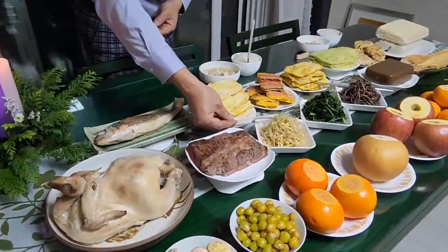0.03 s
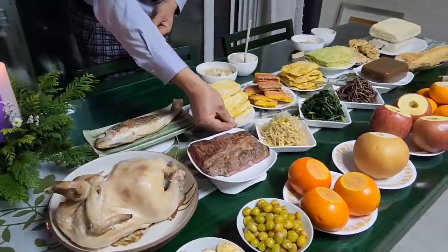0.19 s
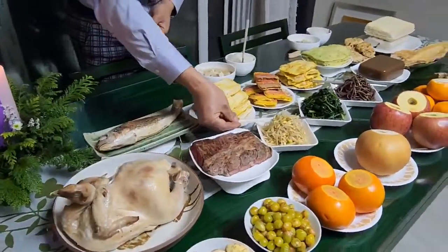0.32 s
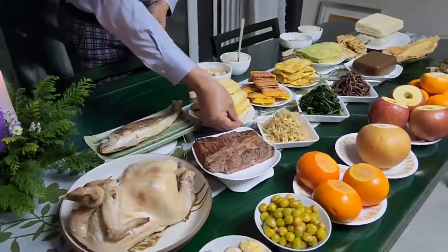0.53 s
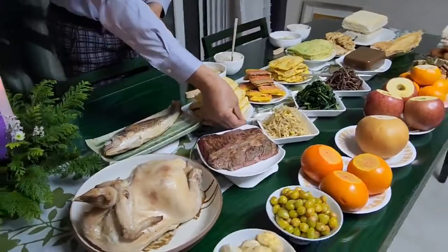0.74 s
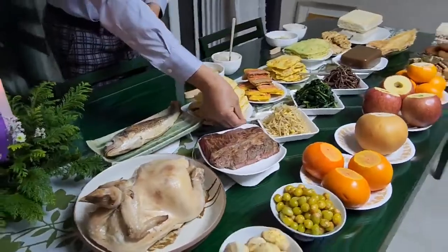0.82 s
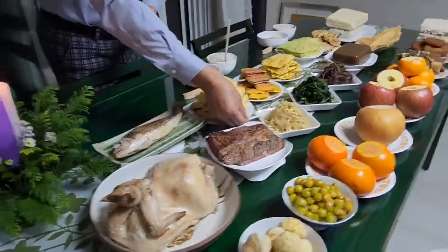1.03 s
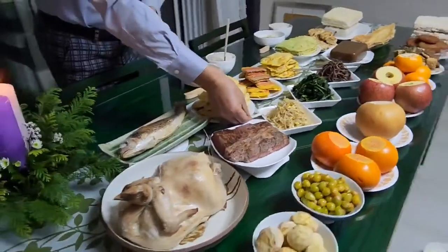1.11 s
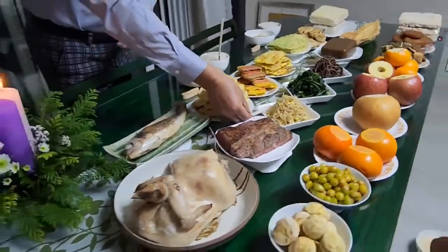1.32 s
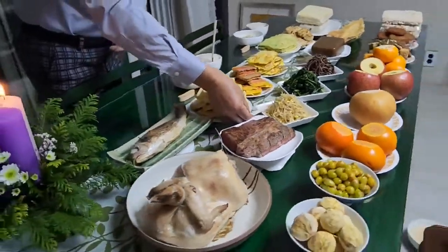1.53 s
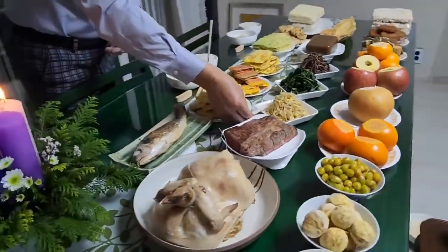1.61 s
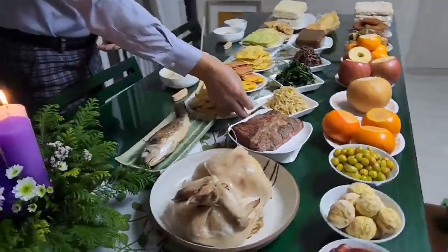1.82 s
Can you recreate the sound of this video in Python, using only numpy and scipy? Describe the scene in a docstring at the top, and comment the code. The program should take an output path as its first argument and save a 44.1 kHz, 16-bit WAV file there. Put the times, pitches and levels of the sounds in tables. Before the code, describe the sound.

Chopsticks set down on a dish with a loud, bright double clack, then dull little taps, a second clearer bowl clink and a closing flurry of ticks, in a bare, lively room, phone a couple of metres away.

```python
"""A bare, lively room, a couple of metres from a phone: chopsticks and dishes are set down on a table.
Each contact is a short clatter of a crack and its bounces. Clinks also ring a dish, built from fading
sines, and boom the table top; short taps knock a body instead. Shaped noise makes the room's answer,
the rustling sleeve and the quiet room tone. Soft thumps through the floor and a low hum are sines."""
import sys
import numpy as np
from scipy import signal
from scipy.fft import rfft, irfft
from scipy.io import wavfile
from scipy.ndimage import uniform_filter1d

SR = 44100
rng = np.random.default_rng(int(sys.argv[2]) if len(sys.argv) > 2 else 0)


def inscribe(sig):
    """Save sig as 16-bit PCM at rate SR to the path in sys.argv[1].

    A 1-D sig is mono; a 2-D sig holds one channel per row.
    Samples are clipped to [-1, 1] before scaling.
    """
    pcm = np.round(np.clip(np.atleast_2d(sig).T, -1, 1) * 32767)
    wavfile.write(sys.argv[1], SR, pcm.astype(np.int16))


N = 83790  # samples in the scene
SIZE = 32768  # samples worked out for each contact
FREQ = np.maximum(np.arange(SIZE // 2 + 1) * SR / SIZE, 1)  # Hz
ALIKE_HZ, BASS_WIDTH = 1240, 0.18  # below this pitch left and right are nearly the same


def undb(db):
    """Turn decibels into a plain multiplier."""
    return 10 ** (np.asarray(db) / 20)


def level(x, db):
    """Scale a sound to a given average (RMS) level."""
    return x * undb(db) / np.sqrt(np.mean(x ** 2))


def curve(hz, at_hz, values):
    """Join points with straight lines on a log-frequency axis."""
    return np.interp(np.log(hz), np.log(at_hz), values)


def stereo(count):
    """Spectra of left and right noise: a shared part plus an opposed part that shrinks in the bass."""
    hz = np.arange(count // 2 + 1) * SR / count
    mid, side = rfft(rng.standard_normal((2, count)))
    wide = np.maximum(hz / np.hypot(hz, ALIKE_HZ), BASS_WIDTH)
    opposed = np.array([[1], [-1]]) * wide * side
    return (mid + opposed) / np.sqrt(1 + wide ** 2)


def walk(rate):
    """A wandering control: random levels, rate of them per second, smoothed; its spread is 1."""
    hold = int(SR / rate)
    steps = np.repeat(rng.standard_normal(N // hold + 1), hold)
    smooth = uniform_filter1d(uniform_filter1d(steps, hold), hold)[:N]
    return smooth / np.std(smooth)


def coloured(points, flicker_db, rate):
    """Stereo noise with a given spectrum; each octave flickers on its own."""
    hz = np.maximum(np.arange(N // 2 + 1) * SR / N, 1)
    octaves = 60 * 2. ** np.arange(9)
    noise = stereo(N) * undb(curve(hz, *np.array(points).T))
    total = 0
    for k in range(9):
        band = irfft(noise * curve(hz, octaves, np.arange(9) == k), N)
        total = total + undb(flicker_db * walk(rate)) * band
    return total


# colour of the room tone: pitch_hz, relative level_db (per Hz)
TONE_COLOUR = [(30, -7), (60, -14), (130, -10), (350, -10.5), (800, -17), (1500, -22.5), (3000, -22),
               (6000, -31), (16000, -42)]
TONE_DB, TONE_FLICKER_DB, TONE_FLICKER_PER_S = -63, 1.0, 8


def room_tone():
    """Steady, quiet noise, strongest in the lows."""
    return level(coloured(TONE_COLOUR, TONE_FLICKER_DB, TONE_FLICKER_PER_S), TONE_DB)


HUM_HZ, HUM_DB = 59, -58
HUM_WAVER_DB, HUM_WAVER_PER_S = 2, 10


def hum(t):
    """A low sine, the same on both sides, whose level wavers and whose phase drifts a little."""
    loudness = undb(HUM_DB + HUM_WAVER_DB * walk(HUM_WAVER_PER_S))
    return loudness * np.sin(2 * np.pi * HUM_HZ * t + .5 * walk(7))


# soft thumps through the floor: start_s, level_db, pitch_hz, fade_s (time to fall by 60 dB)
FLOOR_THUMPS = [(0.865, -49, 67, 0.46), (1.003, -40.5, 73.3, 0.073)]


def floor_thumps(t):
    """Low sines that start at once and die away, the same on both sides."""
    total = 0
    for start, db, hz, fade in FLOOR_THUMPS:
        ago = np.maximum(t - start, 0)
        fading = undb(db) * np.exp(-np.log(1000) * ago / fade)
        total = total - fading * np.sin(2 * np.pi * hz * ago)
    return total


# swells of the sleeve: peak_s, level_db, rise_s (bell-shaped), fall_s (time to fall to 37 %)
SLEEVE_SWELLS = [(.455, -59.5, 0.06, 0.048), (0.864, -58.5, 0.034, 0.15), (1.225, -60.5, 0.031, 0.06),
                 (1.647, -55.5, 0.021, 0.072), (1.818, -46.5, 0.021, 0.013)]
# colour of the cloth: pitch_hz, relative level_db (per Hz)
CLOTH_COLOUR = [(300, -20), (1000, -1.5), (3000, -0.5), (6000, -3.5), (10000, -6), (15000, -10.5)]
CLOTH_GRAIN_DB, CLOTH_GRAIN_PER_S = 2.5, 170


def sleeve_rustles(t):
    """Grainy cloth hiss that swells and fades."""
    shape = 0
    for peak, db, rise, fall in SLEEVE_SWELLS:
        rising = np.exp(-((t - peak) / rise) ** 2)
        falling = np.exp(-np.abs(t - peak) / fall)
        shape = shape + undb(db) * np.where(t < peak, rising, falling)
    return shape * level(coloured(CLOTH_COLOUR, CLOTH_GRAIN_DB, CLOTH_GRAIN_PER_S), 0)


# the room's answer: pitch_hz, fade_s (to fall by 60 dB), build_s, level_db (before each hit's room_db)
ROOM_BANDS = [(170, 0.43, 0.014, 4.5), (400, 0.58, .01, 7.5), (770, 0.4, 0.0027, 9.5),
              (1600, 0.45, .006, 12.5), (3460, 0.26, 0.011, 13), (6400, 0.23, 0.012, 15),
              (12000, 0.25, .003, 11)]


def room():
    """Spectrum of the echoing room: noise that builds up and dies away band by band."""
    t, noise = np.arange(SIZE) / SR, stereo(SIZE)
    centres = [band[0] for band in ROOM_BANDS]
    tail = 0
    for k, (hz, fade, build, db) in enumerate(ROOM_BANDS):
        shape = (1 - np.exp(-t / build)) * np.exp(-np.log(1000) * t / fade)
        band = irfft(noise * curve(FREQ, centres, np.arange(len(centres)) == k))
        tail = tail + band * level(shape, db) / np.sqrt(SIZE)
    return rfft(tail)


def mode(hz, fade):
    """Spectrum of one sine of unit energy that falls by 60 dB in fade seconds (at least 5 ms)."""
    rate = np.log(1000) / max(fade, .005)
    resonance = (rate + 2j * np.pi * FREQ) ** 2 + (2 * np.pi * hz) ** 2
    return np.sqrt(rate / SR) * SR * 4 * np.pi * hz / resonance


# centres of the bass, middle, presence and treble bands of a contact: pitch_hz
BANDS_HZ = [550, 1600, 4200, 10000]
BOUNCE_DB, BOUNCE_SCATTER_DB = -3, 4
RING_BOUNCE = .35  # share of the ring that the bounces drive
RING_ROOM_DB = -8  # rings reach the walls weaker than cracks


def add_contact(out, start, db, bands_db, pan_db, length, room_db, crack, ring, boom=0):
    """One contact and a fading run of uneven bounces crack and ring; the room answers."""
    chance = rng.standard_normal((16, 3))
    when = np.r_[0, np.cumsum(np.abs(chance[1:, 0]))] / 5  # in clatter lengths
    size = undb(BOUNCE_DB + BOUNCE_SCATTER_DB * chance[:, 1]) * np.sign(chance[:, 2]) * np.exp(-when)
    size[0] = 1  # the first contact
    delays = np.exp(-2j * np.pi * FREQ * length * when[:, None])
    run = (size[:, None] * delays).sum(axis=0) / np.sqrt(np.sum(size ** 2))

    direct = run * (crack + boom) + (1 - RING_BOUNCE + RING_BOUNCE * run) * ring
    to_walls = crack + undb(RING_ROOM_DB) * ring + boom
    heard = direct + undb(room_db) * to_walls * room()

    per_hz_db = np.array(bands_db) - 10 * np.log10(np.array(BANDS_HZ) / SR)
    bass_cut = FREQ ** 2 / (FREQ ** 2 + 120 ** 2)
    tint = undb(curve(FREQ, BANDS_HZ, per_hz_db)) * bass_cut
    pad = .01  # seconds of space ahead of the contact
    sides = undb(db + np.array([[pan_db], [-pan_db]]) / 2)
    sound = irfft(heard * tint * np.exp(-2j * np.pi * FREQ * pad)) * sides
    i = int((start - pad) * SR)
    n = min(SIZE, N - i)
    out[:, i:i + n] += sound[:, :n]


# short taps: most knock a dull body, the last two are bright, high ticks. Columns:
# start_s, level_db (before TAP_DB), then bass_db, middle_db, presence_db, treble_db (tint),
# pan_db (left over right), body_hz, body_db (against the crack), clatter_s (bounces fade to 37 %),
# room_db (added to the room's answer)
TAPS = [(0.525, -58.5, -16, 1.5, -3, -38.5, 4, 400, -14, 0.0043, -2),
        (.559, -46, -8, -8, -24, -36, 4, 350, -5, .002, -8),
        (.62, -49, -9, -5, -18, -33, 3, 500, -14, .002, -5),
        (0.732, -32, -5.5, -4.5, -13.5, -31, 2, 326, -13.5, .004, -7),
        (0.895, -54.5, -25, -8, -14, -39, 18, 400, -7, 0.00046, -5),
        (1.041, -47, -7, -6.5, -14.5, -25, 5.5, 594, -11.5, 0.0036, 5.5),
        (1.136, -39.5, -4.5, -5, -15.5, -53, 4.5, 577, -11.5, 0.00222, -8),
        (1.287, -45, -7, -9, -20, -30, 4, 500, -14, .005, 0),
        (1.528, -54.5, 9, -1, -36, -49.5, 6, 445, -22, 0.00378, -9.5),
        (1.727, -38.5, -8.5, -15.5, -21, -35, 2.5, 673, -14.5, 0.0031, -3.5),
        (1.791, -41, -9.5, -2, -31, -16, 1.5, 605, -11.5, 0.0051, -1.5),
        (1.823, -39, -20, -7, -34, -11, 3, 9300, 3, 0.00091, -5.5),
        (1.892, -38.5, -21, -20, -8, -18, 3, 6800, 4, 0.0031, -5)]
TAP_DB, BODY_CYCLES = 14.5, 44  # a body falls by 60 dB in this many cycles, or 5 ms if longer


def taps():
    """Each tap cracks and knocks a body that gives one short note."""
    out = np.zeros((2, N))
    for start, db, low, mid, pres, top, pan, hz, body_db, length, room_db in TAPS:
        body = undb(TAP_DB + body_db) * mode(hz, BODY_CYCLES / hz)
        add_contact(out, start, db, (low, mid, pres, top), pan, length, room_db, undb(TAP_DB), body)
    return out


# contacts that ring a dish: start_s, level_db (before CRACK_DB and RING_DB), then bass_db, middle_db,
# presence_db, treble_db (tint), pan_db (left over right), boom_db (table top, before the level and
# tint), clatter_s (bounces fade to 37 %), room_db (added to the room's answer)
PLATE_HITS = [(.2205, -11, -26, -22, -19.5, -14, 0, 0.5, 0.0026, 2),
              (.236, -11, -18, -17.5, -22.5, -11, 1, -0.5, .0035, -2)]
BOWL_HITS = [(1.299, -31, -18, -17, -14, -32, -1, 5.5, 0.0027, 3.5),
             (1.303, -17.5, -16.5, -19.5, -18, -17.5, -0.17, -9.5, 0.011, 2.5)]
CUP_HITS = [(.081, -44.5, -32, -18, -9.5, -21, 1.5, 4, .006, -5),
            (1.066, -29.5, -11.5, -17, -3.5, -14.5, -2, -12, 0.011, -9),
            (1.669, -38, -15, -11, -15, -20.5, 0.5, -2, .006, -1.5),
            (1.798, -32, -17, -12, -8, -14.5, -0.5, 6.5, 0.01, -5.5)]
# notes that each dish rings with: pitch_hz
PLATE_HZ = [735, 1135, 1431, 3058, 3190, 4306, 4888, 5873, 6471, 8000, 9443, 9493, 10510, 11850, 13500,
            14820]
BOWL_HZ = [715, 1163, 2090, 3035, 4240, 4400, 4613, 5903, 6261, 7747, 8027, 8802, 10310, 11880, 14800]
CUP_HZ = [600, 726, 1330, 2000, 3243, 4300, 4382, 5850, 8236, 9000, 10650, 11890, 14600]
# strength of those notes, in the same order: level_db (before RING_DB), fade_s (to fall by 60 dB)
PLATE_NOTES = [(-5.5, 0.017), (-6.5, 0.083), (-3.5, 0.033), (-0.5, 0.053), (-2, 0.043), (3.5, 0.04),
               (-23.5, 0.13), (-5.5, 0.054), (-7.5, 0.12), (0, 0.023), (-3.5, 0.15), (0, 0.12), (-13, 0.15),
               (-2, 0.027), (-6, 0.0316), (-6.5, 0.023)]
BOWL_NOTES = [(-8.5, 0.027), (-7.5, 0.021), (-4.5, 0.054), (-1.5, 0.059), (-1, 0.039), (-2, 0.094),
              (-12.5, 0.052), (-2.5, 0.02), (-42, 0.12), (-30, 0.14), (-2.5, 0.083), (-5.5, 0.055),
              (-6, 0.017), (-2, 0.024), (-20.5, 0.049)]
CUP_NOTES = [(-8.5, 0.12), (-5.5, 0.013), (-5.5, 0.016), (-6, .04), (-4.5, 0.11), (-5.5, .08),
             (-0.5, 0.062), (-7.5, 0.019), (-4, 0.013), (-6, 0.07), (-11.5, 0.021), (-7.5, 0.038),
             (-10.5, .03)]
RING_DB, CRACK_DB = 6, 3
BLUR, BLUR_DB = .2, -3  # each note has a broad skirt that dies in this share of its time
TABLE_HZ, TABLE_FADE_S = 175.7, 0.051  # boom of the table top


def dish_ring(pitches, notes, share):
    """A dish rings with many fading notes at once, alternating in sign; share scales their fades."""
    total = 0
    for k, (hz, (db, fade)) in enumerate(zip(pitches, notes)):
        total = total + (-1) ** k * undb(db) * mode(hz, fade * share)
    return undb(RING_DB) * total


def dish_clinks():
    """Each clink cracks, rings its dish and booms the table top."""
    out = np.zeros((2, N))
    table = mode(TABLE_HZ, TABLE_FADE_S)
    dishes = ((PLATE_HITS, PLATE_HZ, PLATE_NOTES), (BOWL_HITS, BOWL_HZ, BOWL_NOTES),
              (CUP_HITS, CUP_HZ, CUP_NOTES))
    for hits, pitches, notes in dishes:
        ring = dish_ring(pitches, notes, 1)
        crack = undb(CRACK_DB) + undb(BLUR_DB) * dish_ring(pitches, notes, BLUR)
        for start, db, low, mid, pres, top, pan, boom_db, length, room_db in hits:
            boom = undb(boom_db) * table
            add_contact(out, start, db, (low, mid, pres, top), pan, length, room_db, crack, ring, boom)
    return out


def scene():
    """Add up all layers, from the background to the dishes."""
    t = np.arange(N) / SR
    background = room_tone() + hum(t) + floor_thumps(t)
    return background + sleeve_rustles(t) + taps() + dish_clinks()


TOP_HZ = 15700


def record(dry):
    """The phone cuts the top: a steep low-pass filter."""
    return signal.sosfilt(signal.ellip(10, .2, 70, TOP_HZ, fs=SR, output="sos"), dry)


dry = scene()
out = record(dry)
inscribe(out)
```